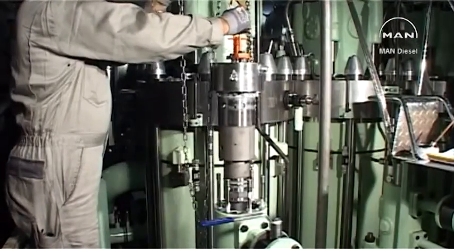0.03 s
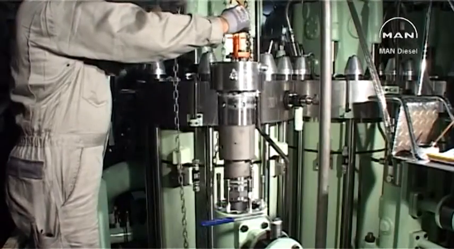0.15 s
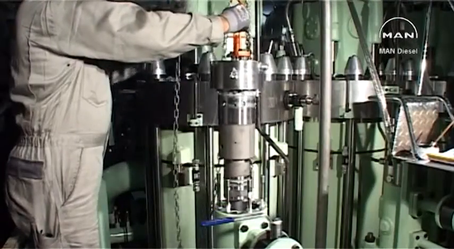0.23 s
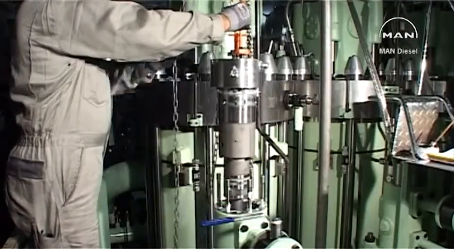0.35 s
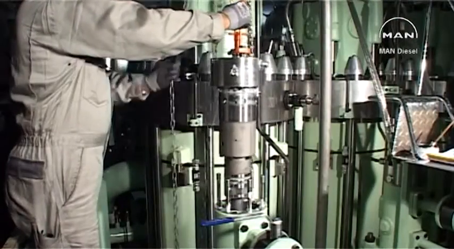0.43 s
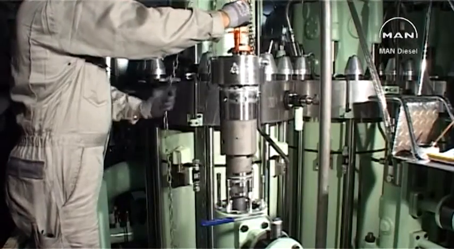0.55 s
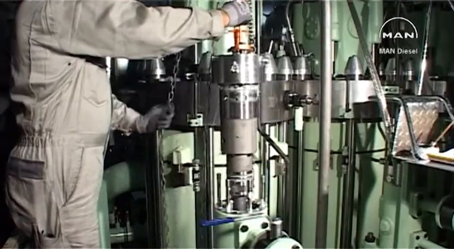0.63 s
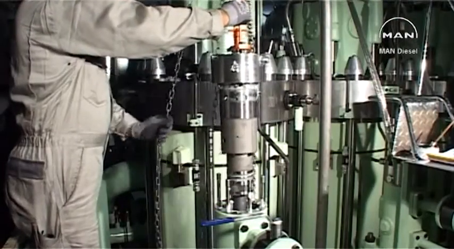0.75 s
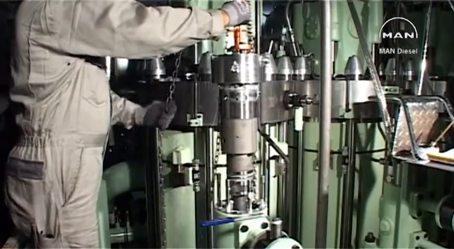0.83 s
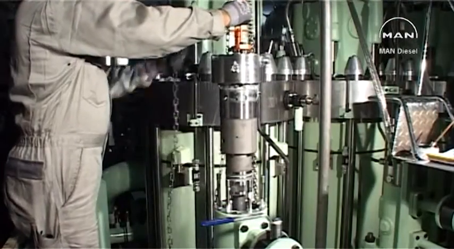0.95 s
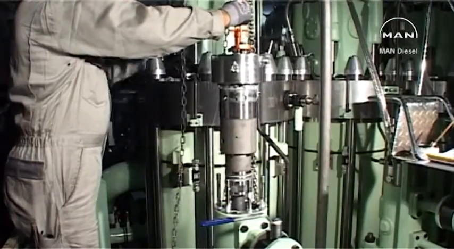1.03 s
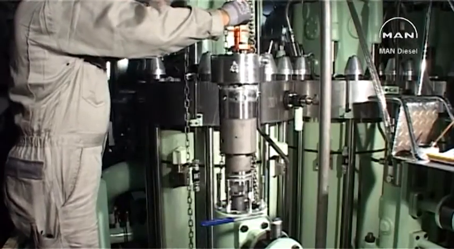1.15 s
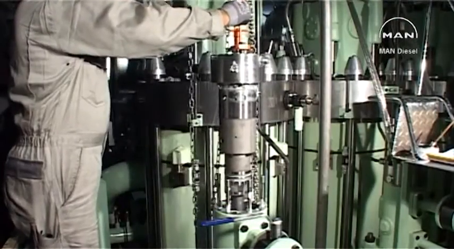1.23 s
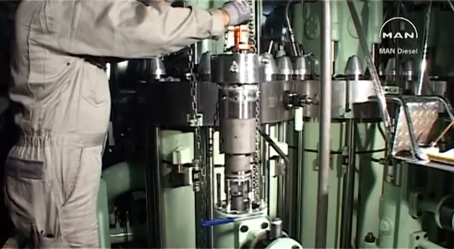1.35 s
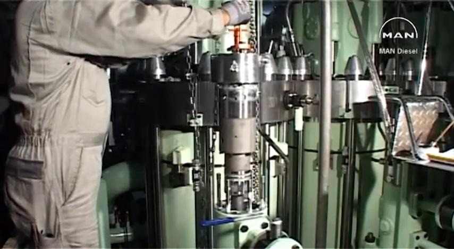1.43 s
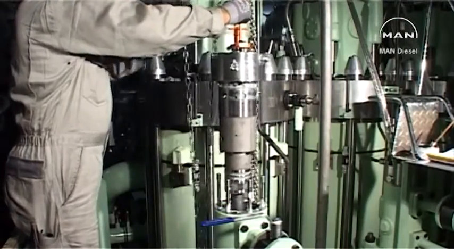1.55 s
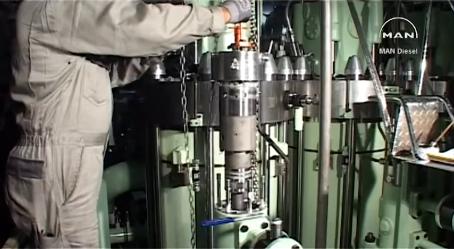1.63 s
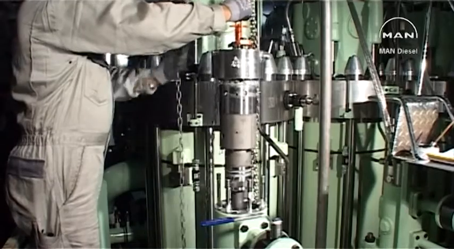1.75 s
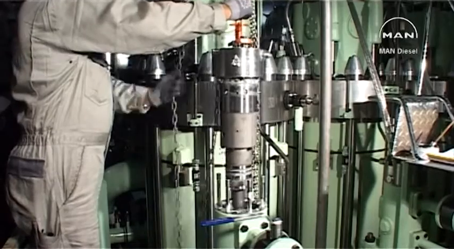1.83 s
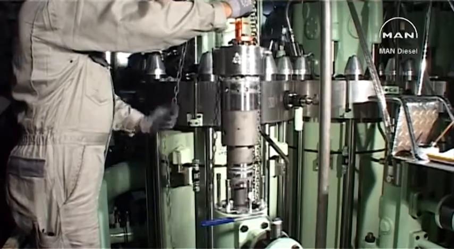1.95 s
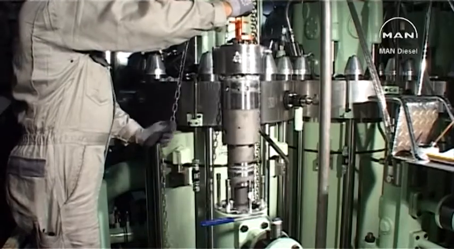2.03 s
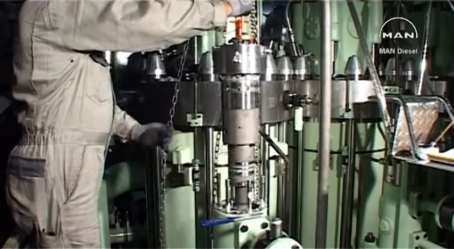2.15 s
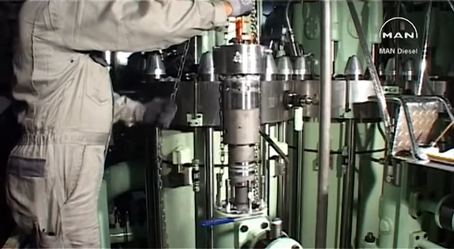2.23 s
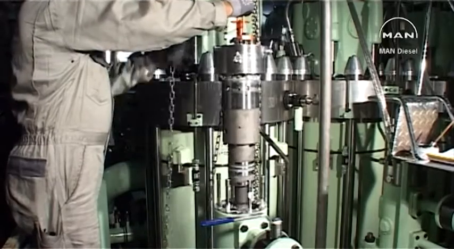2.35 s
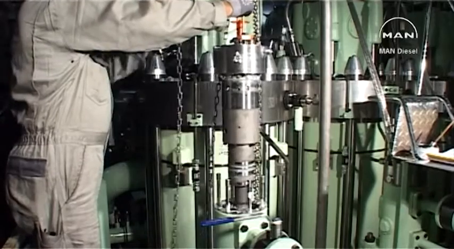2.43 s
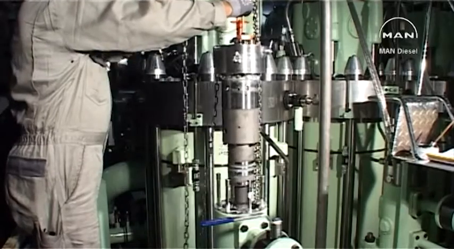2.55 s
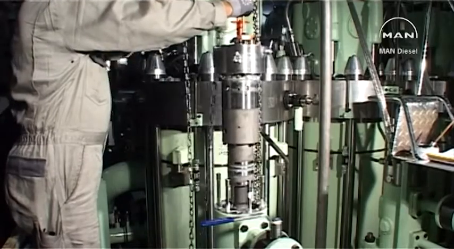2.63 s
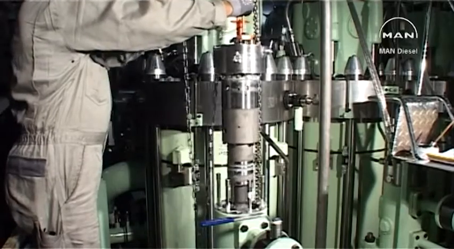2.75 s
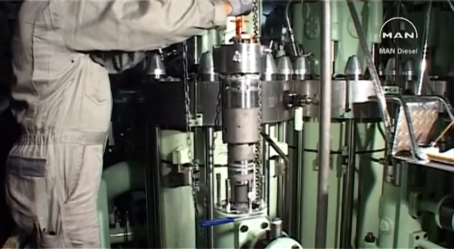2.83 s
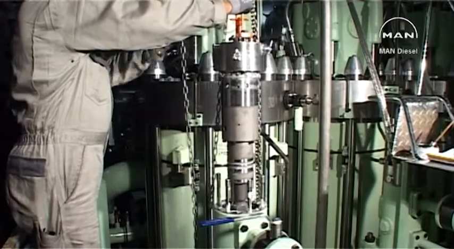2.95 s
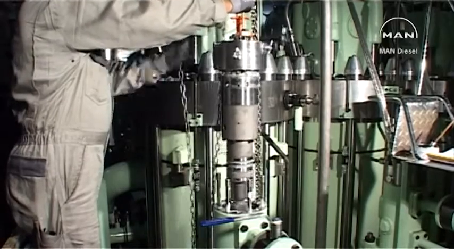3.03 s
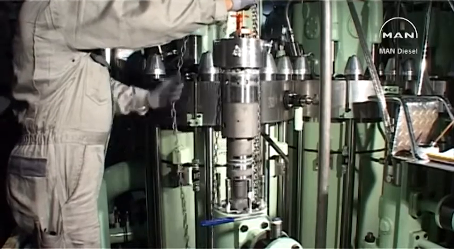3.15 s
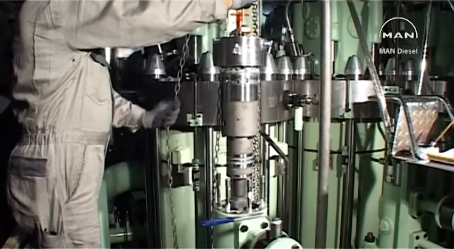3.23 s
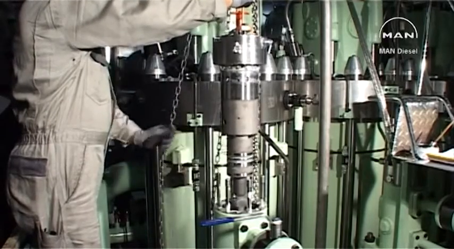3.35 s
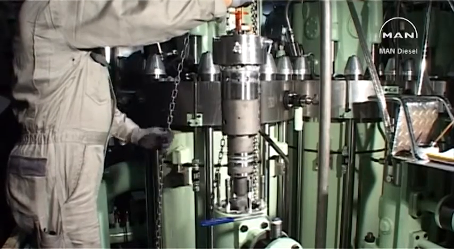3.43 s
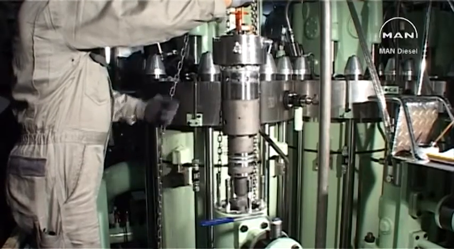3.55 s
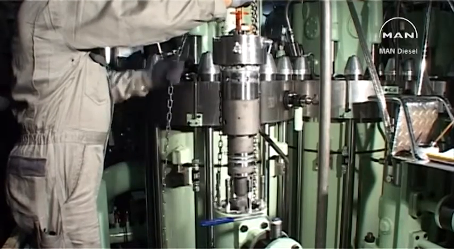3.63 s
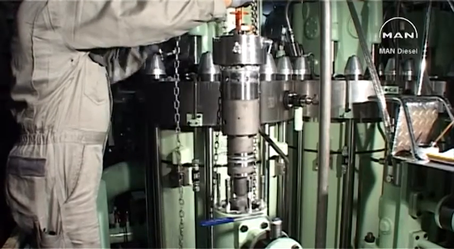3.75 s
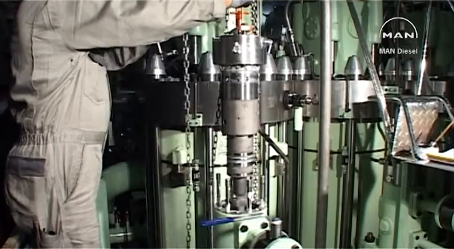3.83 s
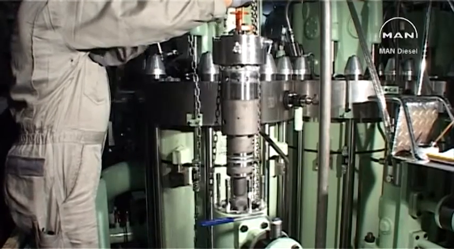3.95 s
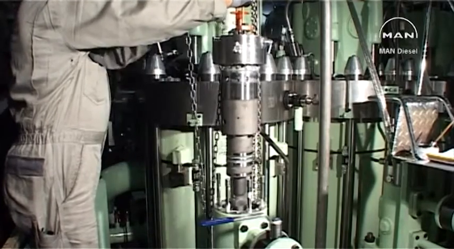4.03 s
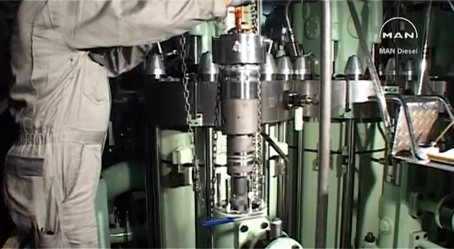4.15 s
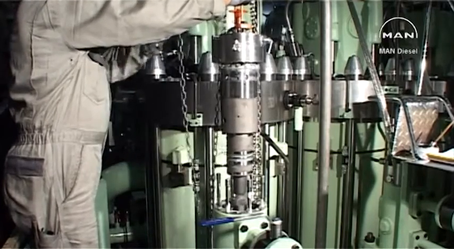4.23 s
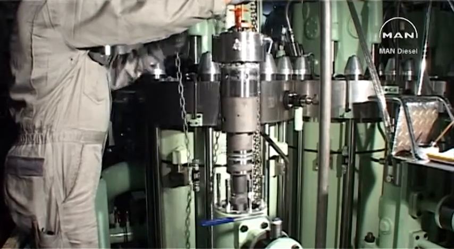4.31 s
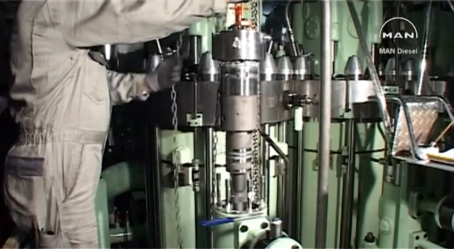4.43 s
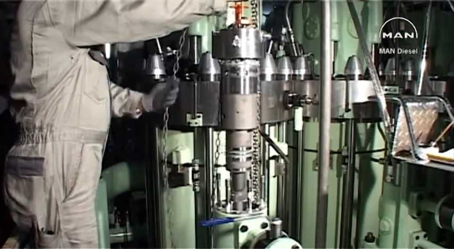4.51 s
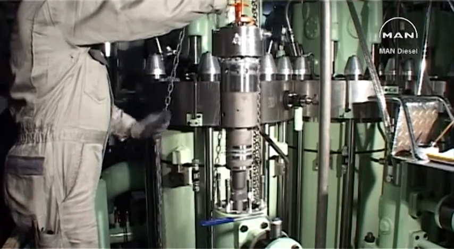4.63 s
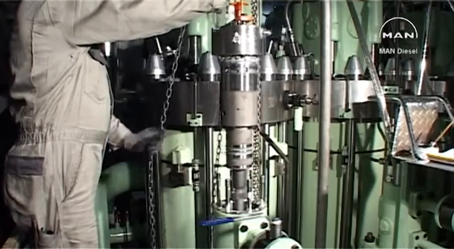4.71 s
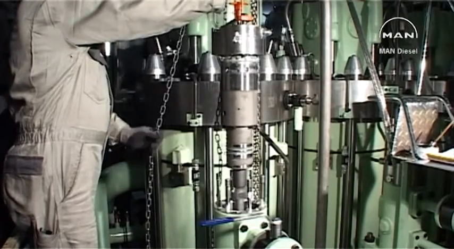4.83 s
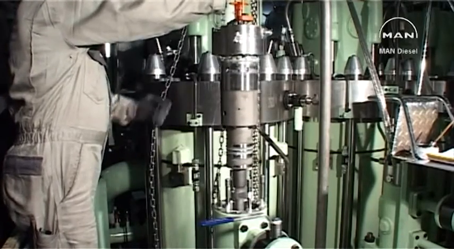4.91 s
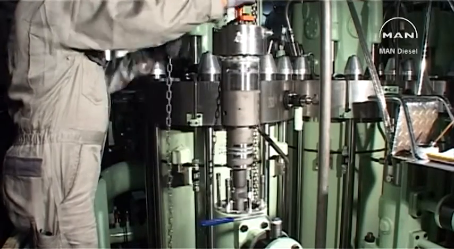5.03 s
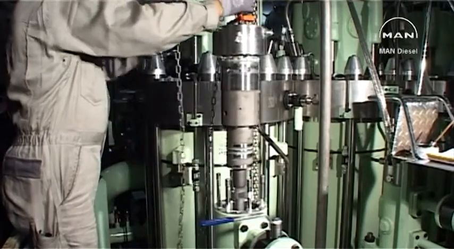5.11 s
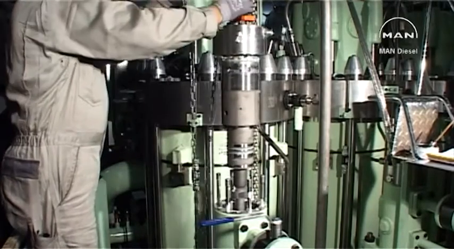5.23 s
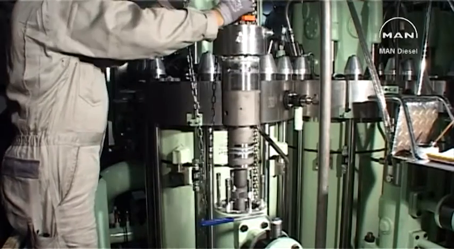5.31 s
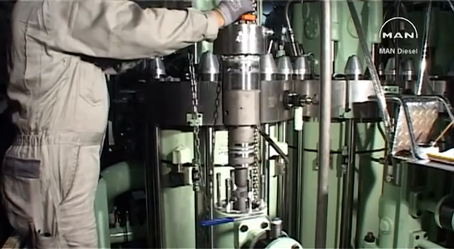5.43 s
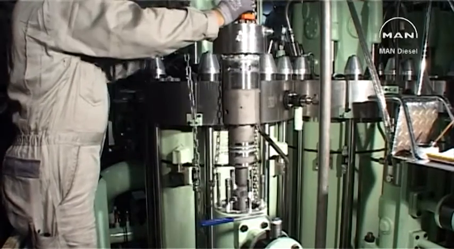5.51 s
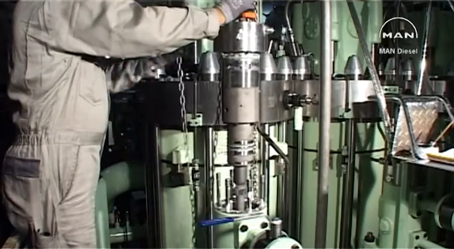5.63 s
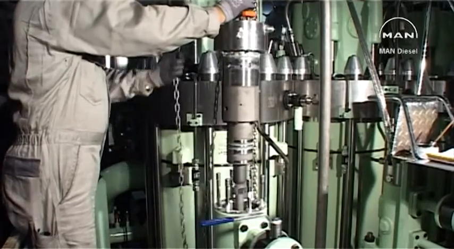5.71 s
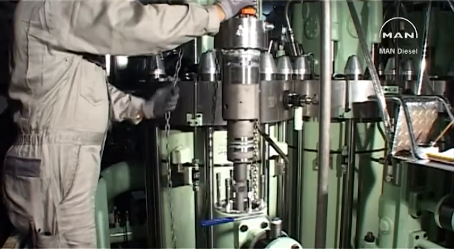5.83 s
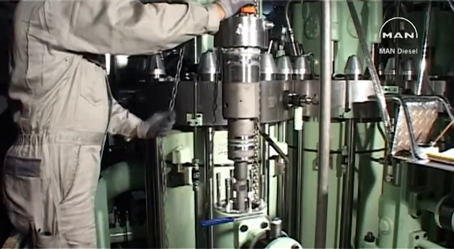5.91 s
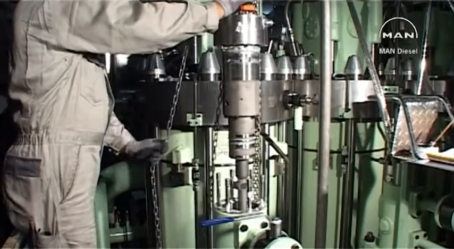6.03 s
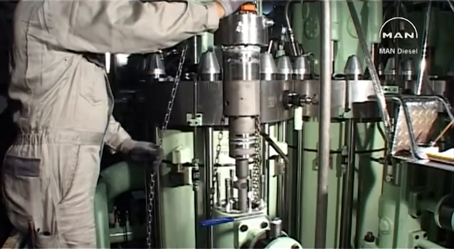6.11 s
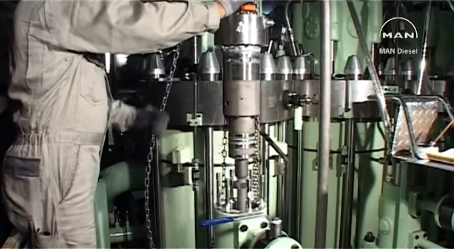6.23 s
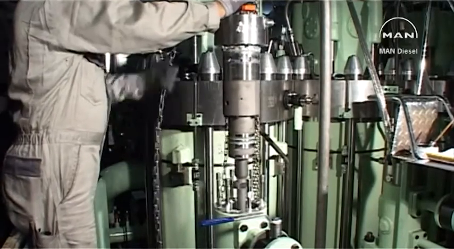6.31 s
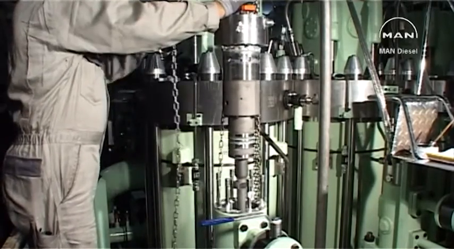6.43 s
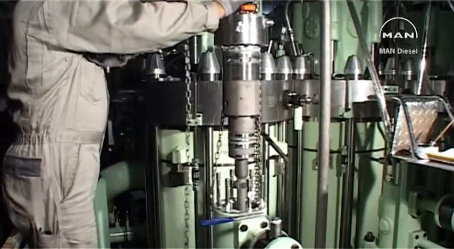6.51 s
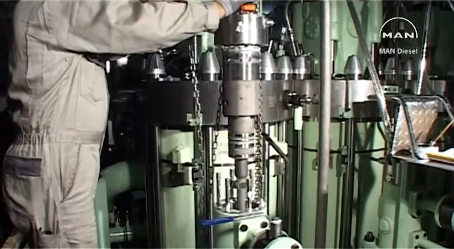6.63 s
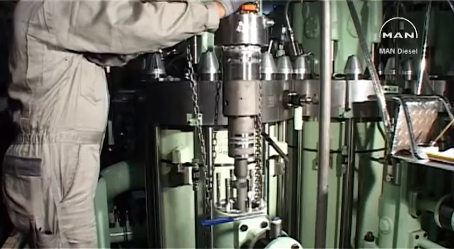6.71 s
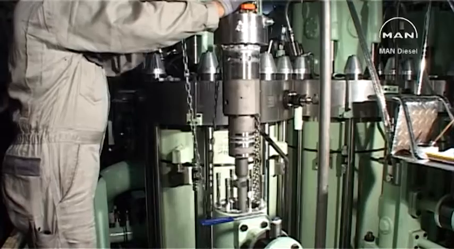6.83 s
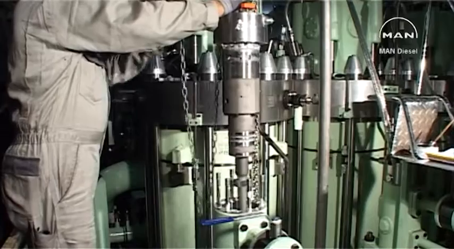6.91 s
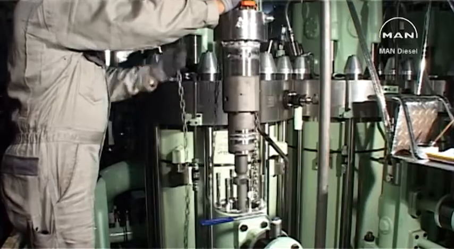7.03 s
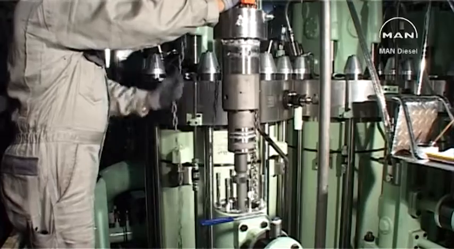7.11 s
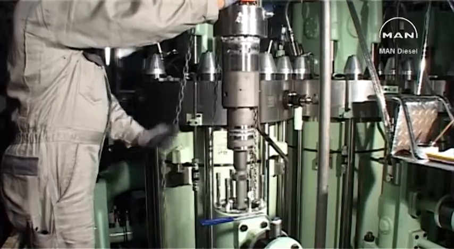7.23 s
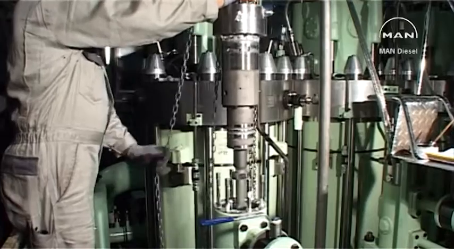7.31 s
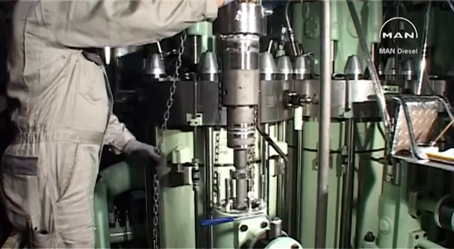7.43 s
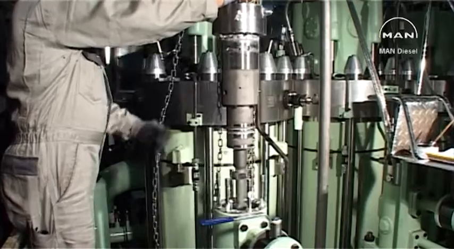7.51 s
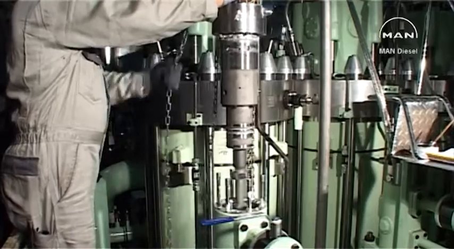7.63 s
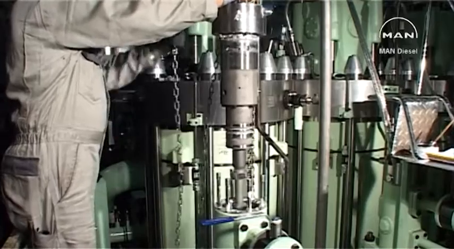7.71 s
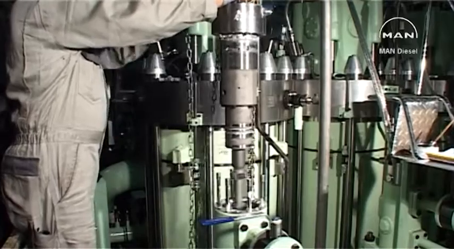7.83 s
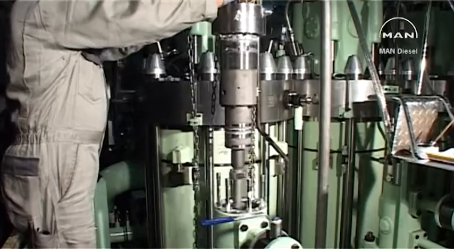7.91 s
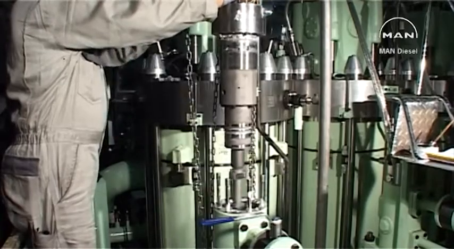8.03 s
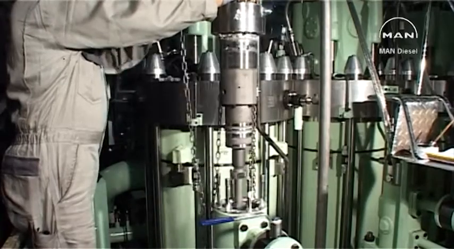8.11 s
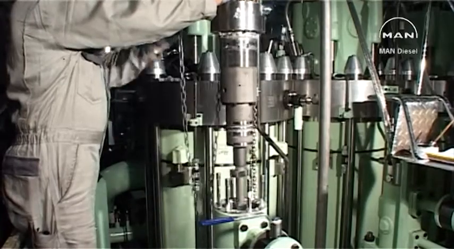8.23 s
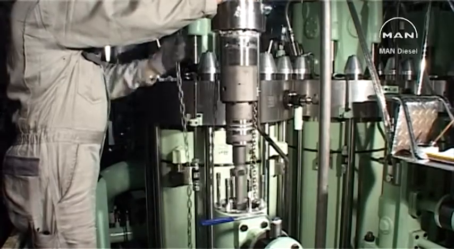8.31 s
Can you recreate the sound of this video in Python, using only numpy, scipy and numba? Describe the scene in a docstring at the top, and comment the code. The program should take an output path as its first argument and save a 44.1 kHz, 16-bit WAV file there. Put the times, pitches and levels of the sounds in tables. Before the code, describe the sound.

A steel hand chain is hauled through a hoist in seven short strokes. Each begins with a light clink of slack taken up, then a ratchet pawl ticks faster and faster while links knock into the wheel and the chain rattles. Between strokes loose links swing, clink and scrape. Close, bright metal sounds stand out over soft machine hum in a hard, reverberant steel room.

```python
"""In a humming engine room of steel walls, a mechanic hauls the hand chain of a hoist in seven strokes.
In each stroke a ratchet pawl ticks faster and faster, links knock into the chain wheel and the running
chain rattles; between strokes the slack chain swings, scrapes and clinks.
Struck steel is a sum of damped modes, dense contacts are decaying noise, and machine tones are wavering
sines; echoes and a reverberant tail follow the hoist."""
import sys
import numpy as np
from scipy import signal
from scipy.fft import rfft, irfft, next_fast_len
from scipy.io import wavfile
from scipy.ndimage import map_coordinates
from numba import njit

SR = 44100
rng = np.random.default_rng(int(sys.argv[2]) if len(sys.argv) > 2 else 0)


def generate_wav(sig):
    """Save sig (samples, or channels by samples) to the path in sys.argv[1] as 16-bit PCM at SR."""
    pcm = np.round(np.clip(np.atleast_2d(sig).T, -1, 1) * 32767).astype(np.int16)
    wavfile.write(sys.argv[1], SR, pcm)


N = 368676
TIME = np.arange(N) / SR


def amp(db):
    """Level definition: an amplitude ratio is 10 to the power dB/20."""
    return 10 ** (np.asarray(db) / 20)


def unit(x):
    """Normalisation to an rms of 1."""
    return x / np.sqrt(np.mean(x ** 2) + 1e-20)


def along(points, hz):
    """Logarithmic frequency scale: (f/Hz, value) points are interpolated on it."""
    f, value = np.transpose(points)
    return np.interp(np.log(hz + 1), np.log(f + 1), value)


def wobble(rate):
    """Slow random modulation: a smooth curve through `rate` random knots a second."""
    knots = rng.standard_normal(int(N * rate / SR) + 4)
    return map_coordinates(knots, [TIME * rate])


def filtered(x, response):
    """Linear filtering: the spectrum is multiplied by a response of frequency."""
    m = next_fast_len(N + 8192)
    return irfft(rfft(x, m) * response(np.fft.rfftfreq(m, 1 / SR)), m)[:N]


def noise(spectrum):
    """Spectral shaping: white noise is coloured by a spectrum and set to rms 1."""
    white = rng.standard_normal(N)
    return unit(filtered(white, lambda hz: amp(along(spectrum, hz))))


def kicks(times, sizes):
    """Impulsive excitation: one impulse for each contact."""
    return np.bincount(np.abs(times * SR).astype(int), sizes, N)[:N]


@njit
def damped_sines(size, starts, sizes, turns, keeps):
    """Free decay: dying sines of given start sample, size, angle and share kept per sample are summed."""
    out = np.zeros(size)
    for k in range(len(starts)):
        a, b = 2 * keeps[k] * np.cos(turns[k]), keeps[k] ** 2
        now, before = sizes[k] * np.sin(turns[k]), 0.
        # stop once the sine has died to 1e-5
        life = int(np.log(1e-5 / (abs(sizes[k]) + 1e-9)) / np.log(keeps[k]))
        for i in range(starts[k], min(starts[k] + life, len(out))):
            out[i] += now
            now, before = a * now - b * before, now
    return out


def pings(times, db, hz, t60):
    """Single-mode resonance: each contact starts one dying sine at its own pitch."""
    keeps = np.full(len(times), amp(-60 / (t60 * SR)))
    return damped_sines(N, (times * SR).astype(np.int64), amp(db), 2 * np.pi * hz / SR, keeps)


def ring(times, db, modes, scatter_db, detune):
    """Modal superposition: contacts kick each mode with new strength and sign; load shifts its pitch."""
    hz, level, t60 = np.transpose(modes)
    draws = rng.standard_normal((len(times), 3, len(hz)))
    size, sign, shift = draws.transpose(1, 0, 2)
    sizes = np.sign(sign) * amp(db[:, None] + level + scatter_db * size)
    turns = 2 * np.pi * hz * (1 + detune * shift) / SR
    keeps = amp(-60 / (t60 * SR))
    starts = np.repeat(np.abs(times * SR).astype(np.int64), len(hz))
    return damped_sines(N, starts, sizes.ravel(), turns.ravel(), np.tile(keeps, len(times)))


def clash(times, db, spectrum, t60):
    """High modal density: the crowd of modes at each contact is a dying burst of noise."""
    keep = amp(-60 / (t60 * SR))
    energy = signal.lfilter([1], [1, -keep * keep], kicks(times, amp(db) ** 2))
    return np.sqrt(energy) * noise(spectrum)


def cluster(times, gap, fall_db, count):
    """Chain of impacts: a contact sets off its neighbours; gives (times, dB re the first), a row each."""
    late, size = rng.random((len(times), 2, count)).transpose(1, 0, 2)
    step = np.arange(count)
    later = step > 0  # the first contact keeps its time and level
    spread = times[:, None] + gap * (step + later * (late - .5))
    return spread, later * 8 * (size - .5) - np.outer(fall_db, step)


# The seven pulls: start t/s, end t/s, first speed/(teeth/s) and acceleration/(teeth/s^2) before
# saturation, limiting speed/(teeth/s), rattle level/dB, travel to the first link/teeth,
# knock level/dB, chain falls slack t/s
PULLS = [(.0995, .768, 21, 455, 84, -.3, 3.1, 1.5, .8594),
         (1.4435, 2.164, 23, 315, 96, -.5, 2.2, -1.5, 2.2194),
         (2.803, 3.468, 20, 400, 108, .3, 3.6, .5, 3.5164),
         (4.125, 4.838, 21, 360, 92, -1, 1.6, -1.5, 4.8892),
         (5.4435, 6.156, 24, 405, 100, 0, 3.9, -.3, 6.2173),
         (6.7955, 7.436, 20, 370, 135, 1, 1.95, .3, 7.5095), (8.126, 8.8, 30, 455, 110, 1, .1, 2.5, 8.86)]
END_SPEED, BRAKING = 24, 480  # nominal speed at the end of a pull, teeth/s; slowing before it, teeth/s^2
FULL_SPEED = 100  # reference speed of a brisk pull, teeth/s


def pulls():
    """Kinematics: the wheel speeds up, runs and brakes; gives (t/s, teeth/s, teeth turned) per sample."""
    for start, stop, first, acceleration, top, *_ in PULLS:
        t = np.arange(0, stop - start, 1 / SR)
        driven = top * np.tanh((first + acceleration * t) / top)
        braked = END_SPEED + BRAKING * (stop - start - t)
        speed = np.minimum(driven, braked)
        turned = np.cumsum(speed) / SR
        # the travel is stretched or shrunk so that the pull ends on a tooth
        turned += (np.round(turned[-1]) + .01 - turned[-1]) * (t / t[-1]) ** 4
        yield start + t, speed, turned


# Spectrum of the machines' rush: f/Hz, relative level/dB per Hz
MACHINE_RUSH = [(15, -13), (35, -6.5), (80, -7), (150, -8.5), (200, -1), (300, -3), (400, -3), (520, -9.5),
                (800, -3), (1200, -15.5), (2200, -14.5), (4000, -21.5), (7000, -37), (15800, -33.5)]
# Machine tones: f/Hz, mean level/dB (rms)
MACHINE_TONES = [(118.4, -69.5), (192.5, -56), (239, -59.5), (258.4, -63), (413, -60.5), (614, -62.5)]


def machinery():
    """Tones in broadband noise: distant machines give a steady rush and wavering sines."""
    tones = 0
    for hz, db in MACHINE_TONES:
        level = amp(db + 1.33 * wobble(7.5))
        tones = tones + level * np.sin(2 * np.pi * hz * TIME + 1.3 * wobble(11))
    return np.sqrt(2) * tones + amp(-49.5) * noise(MACHINE_RUSH)


# Modes of a chain link: f/Hz, relative level/dB, t60/s
LINK_MODES = [(2705, 0, 0.049), (3032, 3, 0.063), (3117, 1, 0.018), (3180, -1.5, 0.15), (3400, -32, 0.044),
              (3630, 1.5, 0.043), (3825, -3.5, 0.017), (3857, 4.5, 0.055), (4086, -2, 0.082),
              (4480, -3.5, 0.041), (5600, -10, 0.056), (5435, -3.5, 0.061), (5850, 1.5, 0.034),
              (6270, -3, 0.11), (7780, -7, 0.069), (9680, -10.5, 0.078), (10960, -6, 0.042)]
# Spectrum of dragging links: f/Hz, relative level/dB per Hz
DRAG_SPECTRUM = [(400, -29), (800, -4), (1250, 2), (1700, -1), (2300, 4), (3200, 0.5), (5000, 4.5),
                 (7000, -10), (15800, -24)]
SWING_DB, GRAB_DB, GRAB_S = -3, 10.5, 0.095  # relative touch level; its rise before a pull, and over what time


def swinging_chain():
    """Random excitation: link grazes link in the hanging loop, livelier as the hand reaches for a pull."""
    times = rng.random(200) * TIME[-1]
    wait = np.array(PULLS)[:, 0] - times[:, None]
    next_pull = np.where(wait > 0, wait, np.inf).min(axis=1)
    reach = np.exp(-next_pull / GRAB_S)
    db = SWING_DB + GRAB_DB * reach + 3 * rng.standard_normal(len(times))
    links = ring(times, db - 57, LINK_MODES, scatter_db=6.0, detune=0.0094)
    return links + clash(times, db - 45, DRAG_SPECTRUM, t60=0.053)


# Hard scrapes of the chain along its guide: t/s, drive level/dB
SCRAPE_EVENTS = [(1.8746, -31), (3.2734, -27), (3.336, -27.5), (3.3904, -26.5), (4.475, -29.5),
                 (5.9655, -20.5), (7.1084, -25), (7.3813, -20)]
# Modes of the rubbed chain guide: f/Hz, relative level/dB, t60/s
GUIDE_MODES = [(927, -3, 0.096), (1233, -4, 0.16), (1397, -23, 0.033), (1570, -4, 0.15), (2000, -16, 0.038),
               (2610, -21, 0.05), (2980, -3, 0.022)]
# Spectrum of a hard steel contact: f/Hz, relative level/dB per Hz
CONTACT_SPECTRUM = [(300, -13), (800, -35), (1400, -28), (2400, -13), (3100, -0.5), (5400, -3.5),
                    (7000, -8.5), (7800, -8.5), (8600, -11), (9600, -6), (10500, -13), (12000, -6),
                    (15800, -16)]


def scraping_chain():
    """Friction as repeated impact: links drag over the ringing guide; each pull first takes up the slack."""
    s, db = np.transpose(SCRAPE_EVENTS)
    times, drop = cluster(s, gap=.006, fall_db=1.1, count=6)
    times, db = times.ravel(), (db[:, None] + drop).ravel()
    drag = ring(times, db - 15, GUIDE_MODES, scatter_db=2.5, detune=0.014)
    drag += clash(times, db - 1.0, DRAG_SPECTRUM, t60=0.04)
    touches, drop = cluster(np.array(PULLS)[:, 0] - .02, gap=0.027, fall_db=1, count=3)
    return drag + clash(touches.ravel(), drop.ravel() - 47, CONTACT_SPECTRUM, t60=0.12)


# Modes excited by the pawl: f/Hz, relative level/dB, t60/s
PAWL_MODES = [(956, -27, 0.076), (2194, -22.5, 0.11), (2667, -25, 0.077), (3133, -17.5, 0.049),
              (3600, -15, 0.097), (4136, -18, 0.09), (4760, -11, 0.07), (4870, 0, 0.023),
              (5540, -13.5, 0.035), (7750, -20, 0.048), (9400, -21, .04), (11400, -20, 0.063),
              (14640, -16.5, 0.053)]
PAWL_DB, PAWL_SPEED_DB = -2, -1  # relative level of a tick, and its change at full speed
EASE_DB, EASE_S = -4, 0.29  # change of level at the last tooth, and its time constant
CRACK_DB, CHIME_DB, BOUNCE_DB = -25, -18, -5.5  # the pawl's contact, the wheel's ring, the pawl's rebound


def ratchet():
    """Periodic impact: the pawl drops off each tooth at a rate set by the wheel's speed, and bounces once."""
    teeth, force = [], []
    for t, speed, turned in pulls():
        drops = np.flatnonzero(np.diff(np.floor(turned), prepend=-1))
        teeth.append(t[drops])
        # at speed the pawl has less time to fall; at the end the hand eases off
        fall = PAWL_SPEED_DB * speed[drops] / FULL_SPEED
        ease = EASE_DB * np.exp(-(t[-1] - t[drops]) / EASE_S)
        force.append(PAWL_DB + fall + ease)
    teeth, force = np.concatenate(teeth), np.concatenate(force)
    size, delay = rng.standard_normal((len(teeth), 2)).T
    rebounds = teeth + .0042 * np.exp(.3 * delay)
    times = np.r_[teeth, rebounds]
    db = np.r_[force + 1.2 * size, force + BOUNCE_DB]
    crack = clash(times, db, CONTACT_SPECTRUM, t60=.03)
    # the wheel's ring starts just after the crack
    chime = ring(times + .0005, db, PAWL_MODES, scatter_db=2, detune=.0045)
    return amp(CRACK_DB) * crack + amp(CHIME_DB) * chime


# Spectrum of the gears: f/Hz, relative level/dB per Hz
GEAR_SPECTRUM = [(200, -49), (520, -30), (760, 10), (970, 2.5), (1100, -4.5), (1600, 0.5), (2150, 6),
                 (2450, 4), (4000, -36)]
RATTLE_DB, RATTLE_POWER = -28.5, 1.25  # drive level at full speed; exponent of growth with speed
RATTLE_LAG_S = 0.029  # the chain trails the wheel
RUMBLE_DB, RUMBLE_POWER = -41, 0.76  # the gears at full speed; exponent of growth with speed
JOSTLE_DB, LINK_RING_DB, LINK_CRACK_DB = 5.5, -10, 1  # spread of the contacts; their ring and their crack


def running_chain():
    """Power law of speed: links jostle at random and gears rumble, both louder the faster the chain runs."""
    speed = 0
    for t, teeth_per_s, _ in pulls():
        speed = speed + np.interp(TIME, t, teeth_per_s, left=0, right=0)
    keep = np.exp(-1 / (RATTLE_LAG_S * SR))
    pace = signal.lfilter([1 - keep], [1, -keep], speed / FULL_SPEED) + 1e-4
    starts, pull_db = np.array(PULLS)[:, [0, 5]].T
    current_pull_db = pull_db[np.searchsorted(starts[1:], TIME)]
    rattle_db = RATTLE_DB + current_pull_db + RATTLE_POWER * 20 * np.log10(pace)
    slots = np.arange(0, TIME[-1] - .01, 1 / 190)  # links follow one another, loosely spaced
    times = slots + .009 * rng.random(len(slots))
    db = np.interp(times, TIME, rattle_db) + JOSTLE_DB * rng.uniform(-0.95, 1, len(times))
    links = ring(times, db + LINK_RING_DB, LINK_MODES, scatter_db=3.5, detune=.018)
    cracks = clash(times, db + LINK_CRACK_DB, CONTACT_SPECTRUM, t60=.016)
    rumble = amp(RUMBLE_DB + 1.5 * wobble(60)) * pace ** RUMBLE_POWER * noise(GEAR_SPECTRUM)
    return links + cracks + rumble


TEETH_PER_LINK = 4.22  # the ratchet's travel from one chain link to the next


def seatings(count):
    """Gear-pitch timing: a link seats every few teeth; gives (t/s, s into the pull, level/dB) of the first."""
    rows = []
    for (t, _, turned), (start, *_, first_link, strength_db, _) in zip(pulls(), PULLS):
        times = np.interp(first_link + TEETH_PER_LINK * np.arange(count), turned, t)
        rows += [(s, s - start, strength_db) for s in times]
    return np.transpose(rows)


# Modes of the chain wheel: f/Hz, relative level/dB, t60/s
WHEEL_MODES = [(705, -14, 0.12), (757, -13, 0.055), (966, -7.5, 0.17), (1593, -7.5, 0.045),
               (1690, -6, 0.051), (1980, -33, 0.052), (1989, -1.5, 0.12), (2147, -4, 0.088),
               (2253, -4.5, 0.14)]
# Part of a pull over which the chain comes taut: first and last t/s into the pull
TIGHTEN_S = [.14, .2]
# Mean lower ring of a seating link: loose f/Hz, taut f/Hz
LOW_RING_HZ = [800, 965]
# Mean upper ring of a seating link: loose f/Hz, taut f/Hz
HIGH_RING_HZ = [2020, 2150]
KNOCK_DB, KNOCK_PEAK_S = -14, .19  # drive level; links knock hardest this long into a pull
KNOCK_RISE_DB_PER_S, KNOCK_FALL_DB_PER_S = 27, 49.5
LOW_RING_DB, HIGH_RING_DB, THUD_DB = -11, -6, -19  # the parts of a knock
UNEVEN_DB = 1.5  # no two links seat alike


def wheel():
    """Tension raises pitch: links knock into their pockets, then settle, and ring higher as the chain tightens."""
    s, age, strength_db = seatings(count=8)
    before_peak = KNOCK_RISE_DB_PER_S * (KNOCK_PEAK_S - age)
    after_peak = KNOCK_FALL_DB_PER_S * (age - KNOCK_PEAK_S)
    db = KNOCK_DB + strength_db - np.maximum(before_peak, after_peak)
    db = db + UNEVEN_DB * rng.standard_normal(len(s))
    low_hz = np.interp(age, TIGHTEN_S, LOW_RING_HZ)
    high_hz = np.interp(age, TIGHTEN_S, HIGH_RING_HZ)
    low_shift, high_shift = 1 + .028 * rng.standard_normal((len(s), 2)).T
    knock = pings(s, db + LOW_RING_DB, low_hz * low_shift, t60=0.092)
    knock += pings(s + 0.003024, db + HIGH_RING_DB, high_hz * high_shift, t60=0.076)
    knock += ring(s + 0.001005, db - 13.0, WHEEL_MODES, scatter_db=4.0, detune=0.011)
    settle = ring(s + .007, db - 15.5, WHEEL_MODES, scatter_db=3.5, detune=0.0039)
    thud = clash(s, db + THUD_DB, GEAR_SPECTRUM, t60=0.17)
    return knock + settle + thud


# Loudest collisions of slack links: t/s, link drive level/dB, f/Hz, clack level/dB, sparkle level/dB
COLLISIONS = [(.834, -19.5, 4180, -27, -53), (.9378, -25, 3200, -51, -40), (1.0999, -38.5, 4300, -37, -40),
              (1.1784, -25, 3150, -28, -48), (1.2166, -33, 2800, -30.5, -62), (1.2735, -30, 3150, -56, -63),
              (1.3236, -30, 2870, -30, -63), (2.237, -19.5, 3970, -57, -51), (2.5217, -33, 4070, -69, -69),
              (2.6218, -31.5, 3020, -66, -56), (2.725, -34.5, 3900, -29.5, -48),
              (3.71, -25.5, 3140, -54, -43), (3.8675, -37, 5500, -68, -49), (3.9988, -37, 6700, -59, -46),
              (4.0387, -30, 2930, -56, -46), (4.9237, -20, 3980, -35, -53), (5.1837, -24, 4720, -78, -56),
              (5.3552, -34, 3600, -47, -70), (6.2949, -21, 4010, -39.5, -40),
              (6.3714, -32.5, 6220, -42, -38.5), (6.3969, -28.5, 4160, -31.5, -39),
              (6.559, -37, 4240, -35, -68), (6.6077, -36, 4150, -28.5, -58),
              (6.7043, -28, 4120, -29.5, -37), (7.5427, -14, 4050, -43, -24),
              (7.5684, -23.5, 3200, -37, -46), (7.6924, -23.5, 4110, -29, -42),
              (7.871, -26, 3880, -45, -58), (8.026, -29, 4040, -55, -50), (8.063, -24, 7460, -38.5, -28)]
# The chain falling slack after each pull: link drive level/dB, f/Hz, clack level/dB, sparkle level/dB
SLACK_FALL = (-21.5, 4706, -26, -33)
# Spectrum of colliding links: f/Hz, relative level/dB per Hz
COLLISION_SPECTRUM = [(600, -40), (1400, -28), (2400, 1), (3100, 10.5), (4200, 8), (6000, -7), (7500, -17),
                      (12000, -31), (15800, -35)]
# Modes of the struck chain guide: f/Hz, relative level/dB, t60/s
CLACK_MODES = [(831, -8.5, 0.058), (966, -17, 0.45), (1610, -0.5, 0.033), (1720, -48, 0.0067),
               (2040, -5.5, 0.1), (2219, 4.5, 0.048)]
# Upper modes of a link: f/Hz, relative level/dB, t60/s
OVERTONE_MODES = [(6390, 0, 0.16), (7300, -5.5, 0.098), (9030, -5, 0.042), (9020, -1.5, 0.093),
                  (12100, -12, 0.055)]
# Spectrum of the bright sparkle: f/Hz, relative level/dB per Hz
SPARKLE_SPECTRUM = [(2000, -4), (5500, 9.5), (6500, -5), (9000, -11), (12000, -0.5), (15800, -28)]


def slack_chain():
    """Multiple collision: loose links clink at their own pitches, clack the guide and set off neighbours."""
    falls = [(slack_s, *SLACK_FALL) for *_, slack_s in PULLS]
    s, db, pitch, clack_db, sparkle_db = np.transpose(falls + COLLISIONS)
    # after a hard clack the neighbours' blows fall off more slowly
    fall_db = np.interp(clack_db, [-50, -30], [9, 3.5])
    times, drop = cluster(s, gap=.007, fall_db=fall_db, count=4)
    at = times.ravel()
    link_each = (db[:, None] + drop).ravel()
    clack_each = (clack_db[:, None] + drop).ravel()
    sparkle_each = (sparkle_db[:, None] + drop).ravel()

    link = pings(s + 0.000926, db - 5.5, pitch, t60=0.052)
    link += ring(at, link_each - 21.5, LINK_MODES, scatter_db=5, detune=0.0174)
    link += clash(s, db - 16, CONTACT_SPECTRUM, t60=0.013)  # the first blow cracks
    link += clash(at, link_each - 13, COLLISION_SPECTRUM, t60=0.073)

    # the clack rises in pitch as the links close up against the guide
    clack_hz = np.interp(times - s[:, None], [0, .014], [1760, 2220]).ravel()
    clack = pings(at, clack_each - 4, clack_hz, t60=0.022)
    clack += ring(at, clack_each - 10.0, CLACK_MODES, scatter_db=5.0, detune=0.0056)
    clack += clash(at, clack_each - 14.0, GEAR_SPECTRUM, t60=0.17)

    sparkle = ring(at, sparkle_each - 11.5, OVERTONE_MODES, scatter_db=6.5, detune=0.032)
    sparkle += clash(at, sparkle_each - 4.5, SPARKLE_SPECTRUM, t60=0.12)
    return link + clack + sparkle


# Grazes of a free-hanging link: t/s, drive level/dB
GRAZES = [(1.125, -43), (3.5513, -39.5), (6.2725, -37.5)]
# Modes of the free link: f/Hz, relative level/dB, t60/s
FREE_LINK_MODES = [(7300, 4, 0.064), (11250, -2.5, 0.064)]


def free_link():
    """Free vibration: a glancing touch rings an unloaded link without any crack."""
    s, db = np.transpose(GRAZES)
    return ring(s, db + 1.5, FREE_LINK_MODES, scatter_db=4.5, detune=0.0028)


# Reverberation time of the room: f/Hz, t60/s
ROOM_DECAY = [(200, 0.29), (1000, 1), (3000, 0.77), (5000, 0.69), (9000, 0.52), (15000, 0.43)]


def room(x, early_db, tail_db):
    """Reverberation: nearby steel throws back early echoes; the tail lasts longest in the middle range."""
    hz, t, z = signal.stft(rng.standard_normal(SR), SR, nperseg=256)
    decay = amp(-60 * t / along(ROOM_DECAY, hz)[:, None])
    tail = signal.istft(z * decay, SR, nperseg=256)[1][:SR]
    early = rng.standard_normal(SR) * amp(-60 * TIME[:SR] / 0.035)
    answer = amp(early_db) * early / np.linalg.norm(early)
    answer = answer + amp(tail_db) * tail / np.linalg.norm(tail)
    delayed = np.pad(answer, (SR // 400, 0))  # the first echo comes 2.5 ms late
    return signal.fftconvolve(x, delayed)[:N]


def scene():
    """Superposition: the hoist's parts, the room's answer to them and the machinery add."""
    hoist = swinging_chain() + scraping_chain() + ratchet() + running_chain()
    hoist = hoist + wheel() + slack_chain() + free_link()
    # small parts radiate little bass
    highpass = signal.butter(2, 420, "high", fs=SR, output="sos")
    hoist = signal.sosfilt(highpass, hoist)
    return (machinery() + hoist + room(hoist, early_db=-6.5, tail_db=-10.0))[None]


TOP_HZ = 15950  # upper band limit


def record(dry):
    """Band limitation: nothing passes at or above the limit."""
    return filtered(dry[0], lambda hz: hz < TOP_HZ)[None]


dry = scene()
out = record(dry)
generate_wav(out)
```